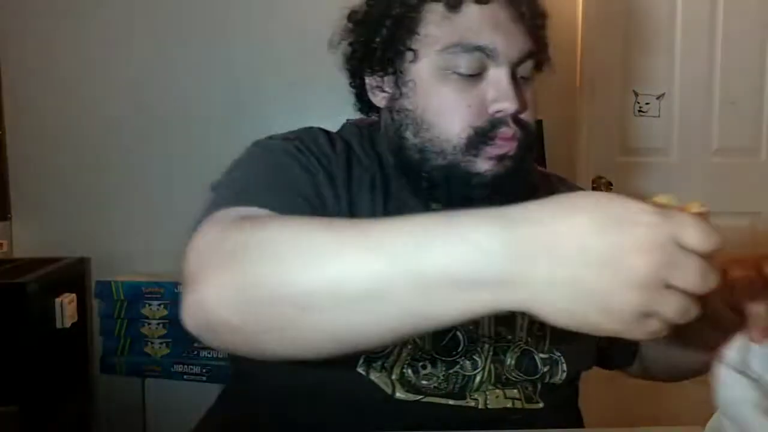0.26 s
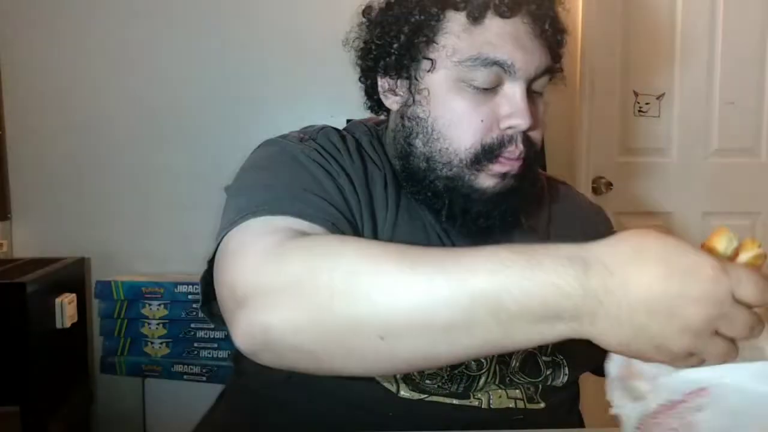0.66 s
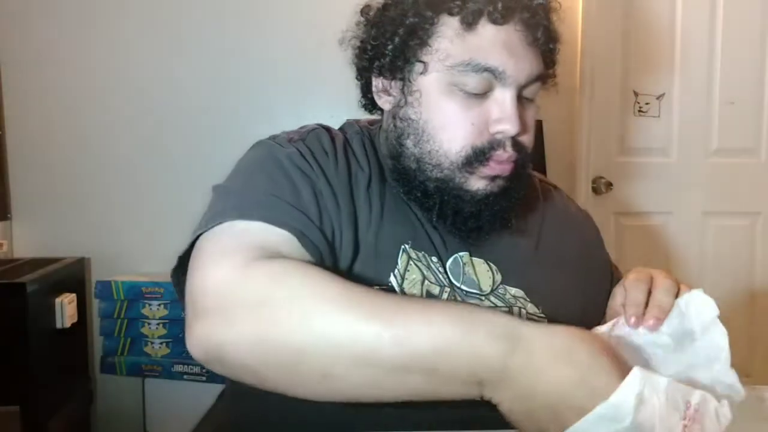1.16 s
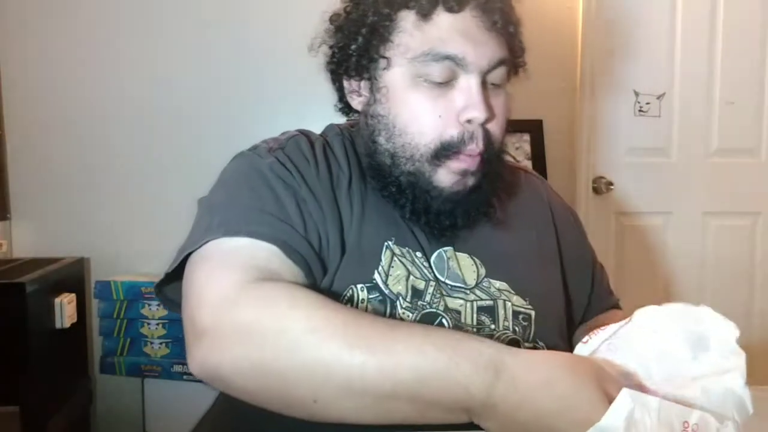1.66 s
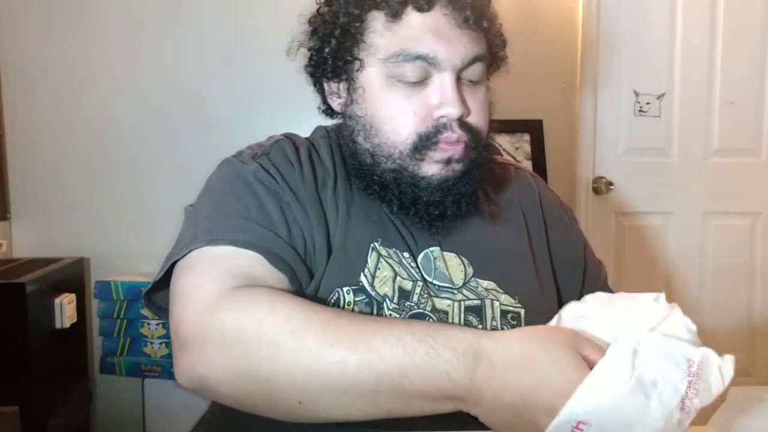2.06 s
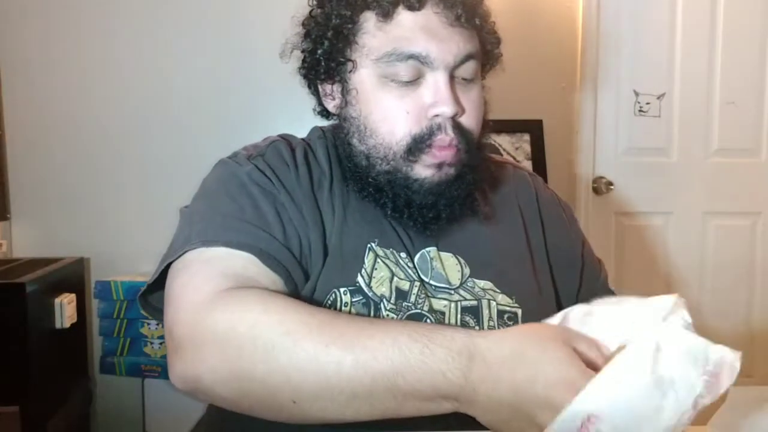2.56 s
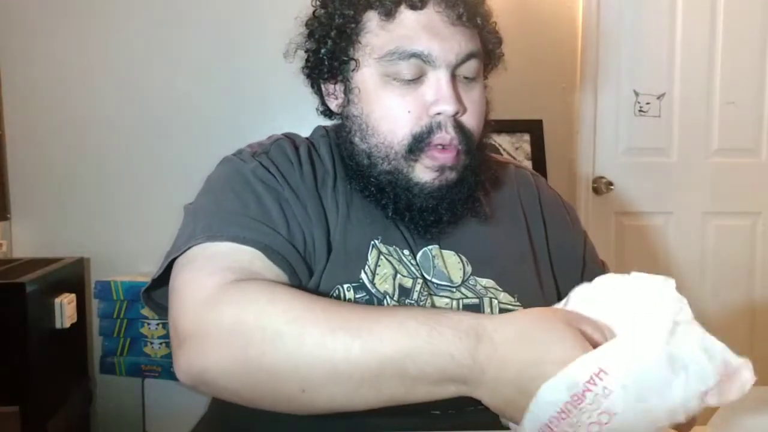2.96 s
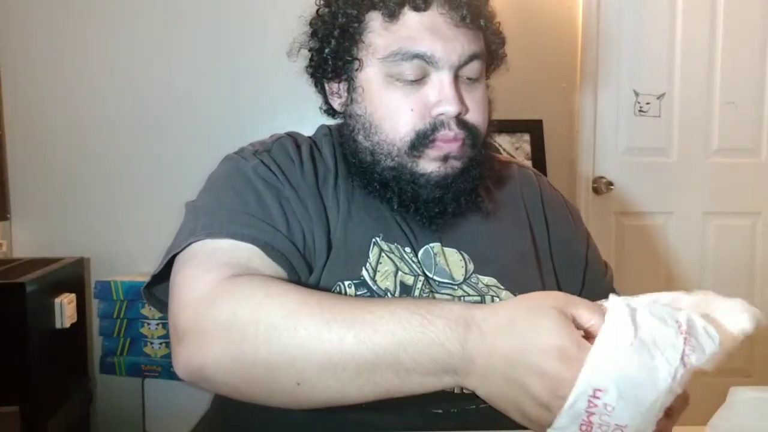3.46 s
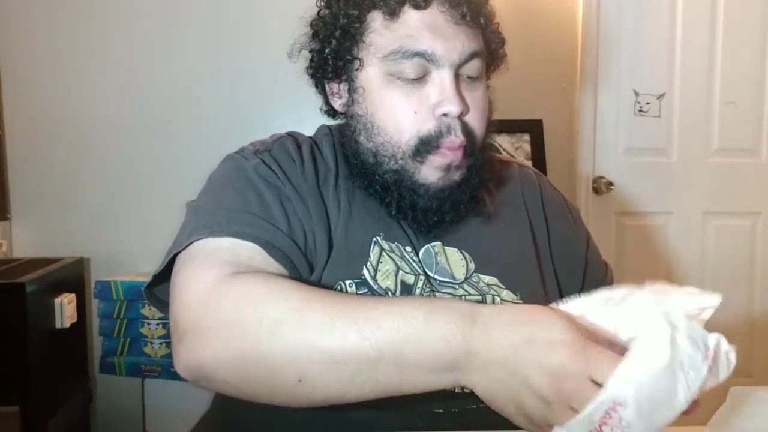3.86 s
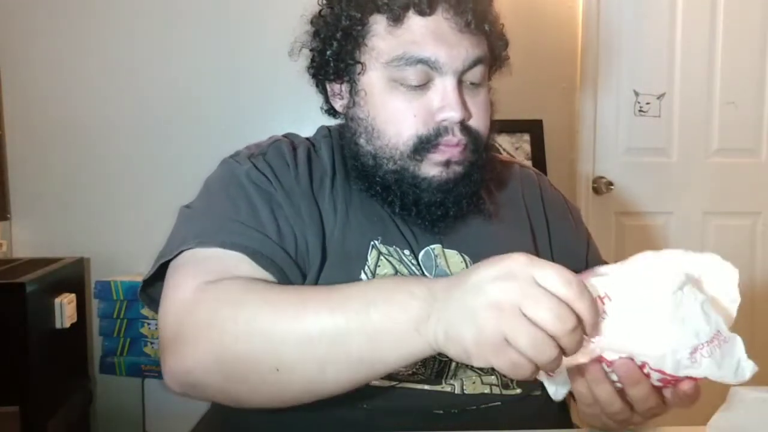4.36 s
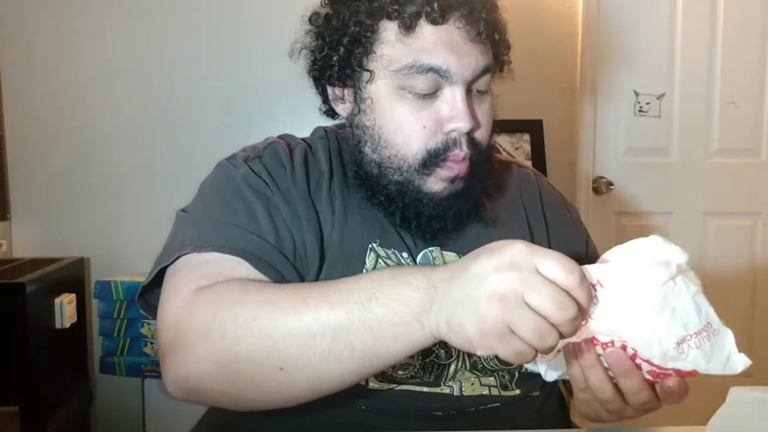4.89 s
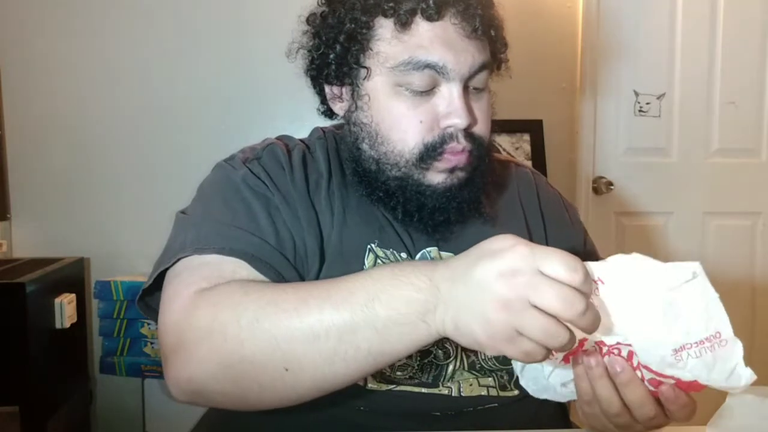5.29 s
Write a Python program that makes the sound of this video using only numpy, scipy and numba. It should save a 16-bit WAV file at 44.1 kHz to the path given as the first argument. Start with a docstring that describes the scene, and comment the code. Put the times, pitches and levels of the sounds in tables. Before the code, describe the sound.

A thin, crisp paper food wrapper is crumpled and turned in two hands at a table, heard close in stereo in a small room with short, blurred echoes. Dense fine crackling starts at once and surges at 0.3 s, with hollow panel pops and a low sleeve rumble beneath. A sharp snap comes at 0.6 s, a bright rustle around 0.75-1 s, and a tight higher pop at 1.6 s. Rustling continues in waves, with a soft forearm bump on the table at 2.1 s, a fuller squeeze near 2.5 s, a hard dry snap at 2.86 s and faint cloth drag around 3 s. Low pops cluster at 4.1-4.4 s, with snaps to 4.5 s. The crackle fades to near silence by 4.8 s, then a brief rustle at 4.95-5.3 s and a final crackle with a pop at 5.5 s. Faint air hush throughout; highest treble leans left.

```python
"""Crisp, close crinkling: a paper food wrapper is crumpled and turned in two hands at a table in a small room.
Tens of thousands of tiny creases ring as very short notes; a few big creases stand out as bursts of such notes.
Wide panels of the sheet pop low, cloth drags in short rumbles and a forearm bumps the ringing table top.
Changing echoes blur the paper, and a faint hush of shaped noise lies under it all.
The sound is stereo, with the paper's highest treble stronger on the left."""
import sys
import numpy as np
from scipy import signal
from scipy.fft import rfft, irfft, next_fast_len
from scipy.io import wavfile
from scipy.ndimage import uniform_filter1d, map_coordinates
from numba import njit

SR = 44100
rng = np.random.default_rng(int(sys.argv[2]) if len(sys.argv) > 2 else 0)


def wav_out(sig):
    """Save sig, one row per channel (or a flat mono array), as 16-bit PCM at SR to the path in sys.argv[1]."""
    wavfile.write(sys.argv[1], SR, np.round(np.clip(np.atleast_2d(sig).T, -1, 1) * 32767).astype(np.int16))


def decibels_to_gain(level_db):
    """Convert a level in decibels to a linear amplitude gain (20 dB per decade)."""
    exponent = np.asarray(level_db, float) / 20
    return 10 ** exponent


N = 243784  # length in samples

RISE_CYCLES = 0.45  # nothing starts ringing at once
LEFT_LAG_S, LAG_SPREAD_S = 0.00009, 0.00008  # how much later the left port hears the sheet
TOP_HZ = 15390  # upper edge of the treble


def read(table, hz):
    """Look up a (f/Hz, value) table along a log-frequency axis."""
    f, value = np.transpose(table)
    return np.interp(np.log(np.maximum(hz, 1)), np.log(f), value)


def colour(x, db):
    """Filter by a gain in dB that depends on frequency."""
    size = next_fast_len(N)
    gain = decibels_to_gain(db(np.arange(size // 2 + 1) * SR / size))
    return irfft(rfft(x, size) * gain, size)[..., :N]


def walk(rate):
    """Random level that glides to a new value every 1 / rate seconds; its spread is about 0.6."""
    hold = int(SR / rate)
    steps = np.repeat(rng.standard_normal(N // hold + 1), hold)
    return 0.78 * uniform_filter1d(steps, hold)[:N]


def alike_in_bass(split_hz):
    """Two noises that share the bass and differ in the treble."""
    mid, side = rng.standard_normal((2, N))
    side = colour(side, lambda hz: -10 * np.log10(1 + (split_hz / (hz + 1)) ** 4))
    return mid + side * np.array([[1], [-1]])


@njit
def rings(start, hz, t60, size):
    """Damped sines that start between samples and swell over about RISE_CYCLES of their own cycles."""
    out = np.zeros(N)
    for k in range(len(start)):
        first = int(start[k]) + 1
        rate = 2j * np.pi * hz[k] / SR - np.log(1000) / (t60[k] * SR)
        wave = size[k] * np.exp(rate * (first - start[k]))
        turn = np.exp(rate)
        shrink = np.exp(-hz[k] / SR / RISE_CYCLES)
        missing = shrink ** (first - start[k])  # the part that has not swelled up yet
        for i in range(max(first, 0), min(first + int(t60[k] * SR) + 2, N)):
            out[i] += wave.imag * (1 - missing)
            missing *= shrink
            wave *= turn
    return out


def heard(s, hz, t60, size, place):
    """Each spot on the sheet reaches the two microphone ports with its own lag, pitch shade and balance."""
    half_lag = (LEFT_LAG_S + LAG_SPREAD_S * place[0]) * SR / 2
    shade = 1 + np.clip(hz / 60000, 0, 0.2) * place[1]
    balance = decibels_to_gain(2.31 * place[2] * np.clip(hz / 800 - 0.3, 0, 1))
    top = 0.45 * SR
    left = rings(s * SR + half_lag, np.minimum(hz * shade, top), t60, size * balance)
    right = rings(s * SR - half_lag, np.minimum(hz / shade, top), t60, size / balance)
    return np.array([left, right])


# Squeezes of the sheet. Columns: t/s at full strength, effort level/dB,
# time/s to swell by STEP_DB, time/s to fade by STEP_DB
SQUEEZES = [(0.063, -52.0, 0.016, 0.041), (0.148, -50.0, 0.015, 0.061), (0.231, -46.5, 0.035, 0.085),
            (0.314, -40.0, 0.014, 0.1), (0.486, -49.0, 0.02, 0.16), (0.6, -46.5, 0.021, 0.15),
            (0.75, -44.0, 0.0039, 0.065), (0.914, -51.5, 0.023, 0.18), (1.08, -51.5, 0.0038, 0.35),
            (1.177, -46.5, 0.049, 0.057), (1.349, -47, 0.14, 0.087), (1.526, -51.5, 0.18, 0.16),
            (1.61, -48.0, 0.02, 0.039), (1.701, -58.0, 0.012, 0.097), (1.893, -51.0, 0.14, 0.19),
            (1.967, -45.5, 0.023, 0.12), (2.118, -51.0, 0.1, 0.17), (2.313, -49.5, 0.05, 0.07),
            (2.462, -44.5, 0.054, 0.084), (2.582, -42.0, 0.13, 0.15), (2.765, -53.0, 0.5, 0.031),
            (2.836, -50.0, 0.037, 0.38), (3.08, -47.0, 0.5, 0.095), (3.23, -53.0, 0.19, 0.062),
            (3.343, -51.0, 0.013, 0.38), (3.418, -49.0, 0.086, 0.2), (3.614, -44.5, 0.062, 0.11),
            (3.76, -47.0, 0.023, 0.14), (3.928, -48.5, 0.069, 0.28), (4.111, -43.5, 0.041, 0.083),
            (4.198, -50.0, 0.5, 0.055), (4.36, -51.5, 0.081, 0.2), (4.491, -46.5, 0.23, 0.15),
            (5.03, -60, 0.07, 0.05), (5.05, -50.5, 0.01, 0.21), (5.159, -50.0, 0.096, 0.125),
            (5.45, -66, 0.08, 0.07), (5.523, -53.5, 0.0037, 0.13)]
# Light rubbing of fingers on paper, heard between the squeezes. Columns: t/s, effort level/dB
RUBBING = [(0.0, -59), (2.5, -72), (4.4, -72), (4.82, -82), (4.95, -70), (5.4, -77), (5.53, -68)]
# Treble of the crackle at middling effort. Columns: t/s, relative level/dB
TREBLE = [(0.0, 2.0), (0.55, -2.5), (0.8, 2.5), (0.97, 8.5), (1.1, -0.5), (1.97, -1.5), (2.35, 3.0),
          (2.5, -4.5), (2.62, -2.0), (3.3, 0.5), (3.45, 2.5), (3.65, -2.0), (4.15, 1.5), (4.5, -2.0),
          (4.78, -5.0), (4.9, -12.5), (4.96, 1.0), (5.25, -0.5), (5.42, -6.5), (5.53, -2.5)]
STEP_DB, FADE_POWER = 12, 1.4  # a fade starts gently and steepens
CRISP_DB_PER_DB, MIDDLING_DB = 0.35, -50  # harder squeezes crackle brighter


def hands():
    """Effort and crispness (dB) over time: squeezes swell and fade, and their powers add to the rubbing."""
    t = np.arange(N // 32 + 2) * 32 / SR
    full, db, swell, fade = np.transpose(SQUEEZES)[:, :, None]
    before = np.maximum(full - t, 0) / swell
    after = np.maximum(t - full, 0) / fade
    db = db - STEP_DB * (before + after ** FADE_POWER)
    power = decibels_to_gain(2 * np.maximum(db, -200)).sum(axis=0)
    power = power + decibels_to_gain(2 * np.interp(t, *np.transpose(RUBBING)))
    effort = 10 * np.log10(power)
    crisp = np.interp(t, *np.transpose(TREBLE)) + CRISP_DB_PER_DB * (effort - MIDDLING_DB)
    return t, effort, crisp


# Tone of the paper's small creases. Columns: f/Hz, relative level/dB
PAPER = [(180, -26), (290, 0), (400, -2), (520, -1), (750, -5), (2040, .5), (3610, 1), (5010, 2.2),
         (8880, 0.5), (11200, 5), (15000, -5)]
# Low crackle of the wide folds, over the rest. Columns: t/s, relative level/dB
LOWS = [(0, 4.5), (.4, 2), (.85, -1.5), (1.15, 2.5), (2.3, 1), (2.6, -2.5), (2.95, 2.5), (3.3, -2.5),
        (4.3, 3), (4.93, -10), (5.2, 2.5), (5.32, 6), (5.45, -2)]
CREASES_PER_S = 12000


def crackle(zones=12):
    """Dense small creases of every pitch; effort sets their size, and they come in quick flurries."""
    count = int(CREASES_PER_S * N / SR)
    when, pitch, big, sign = rng.random((count, 4)).T
    s = when * N / SR
    hz = 220 * 75 ** pitch ** 0.5
    t, effort, crisp = hands()
    treble = np.clip(np.log2(hz / 5000) / 1.15, 0, 1)
    db = np.interp(s, t, effort) + treble * (np.interp(s, t, crisp) + 1.0)
    # a light touch moves the wide, low-sounding folds less
    db = db + 0.33 * np.clip(np.log2(1300 / hz), 0, 0.5) * 2 * np.minimum(db + 65.0, 0)
    db = db + np.clip(np.log2(1200 / hz), 0, 0.5) * 2 * np.interp(s, *np.transpose(LOWS))
    # one flurry shakes the whole sheet, others favour creases of one size
    sheet_db = 0.9 * walk(50) + 0.4 * walk(180)
    zone_db = np.array([4.0 * walk(9) + 2.7 * walk(60) for _ in range(zones)])
    at = when * (N - 1)
    zone = np.log2(hz / 220) / 6.3 * (zones - 1)
    db = db + sheet_db[at.astype(int)] + map_coordinates(zone_db, [zone, at], order=1)
    # a few creases are much bigger than most, above all the low ones
    db = db - 2.5 * np.clip(4500 / hz, 0, 1) * np.log(1.002 - big) + read(PAPER, hz)
    size = np.sign(sign - 0.5) * decibels_to_gain(db - 0.4) * (hz / 3000) ** 0.56
    return heard(s, hz, 9.18 / hz, size, rng.standard_normal((count, 3)).T)


# Tone of the room hush. Columns: f/Hz, relative level/dB
HUSH = [(24, -12), (85, -3), (166, 2), (301, -15), (505, -6), (802, -27), (1170, 0), (1460, -13), (2600, 1),
        (3500, -14), (6000, -9), (8100, -24), (16000, -32)]
HUSH_DB = -73  # middle level


def hush():
    """The faint steady air of the room: shaped noise, wavering a little."""
    air = colour(alike_in_bass(40), lambda hz: read(HUSH, hz))
    return air / air.std() * decibels_to_gain(HUSH_DB + 1.5 * walk(16))


# Ringing modes of the table top. Columns: f/Hz, relative level/dB, time/s to die away by 60 dB
TABLE = [(83.8, -11.5, 0.66), (120.6, 2, 0.14), (154.7, 5, 0.23), (187, -6, 0.2)]
# Forearm on the table. Columns: t/s, relative level/dB, f/Hz of the modes nearest the spot that is pushed
BUMPS = [(2.138, -48, 163), (4.874, -61, 155)]


def table_top():
    """Soft pushes ring the low modes of the table top; the hands' work keeps it humming faintly."""
    hz, mode_db, t60 = np.transpose(np.array(TABLE)).copy()
    out = 0
    for s, db, spot_hz in BUMPS:
        size = decibels_to_gain(db + mode_db - 12.3 * np.abs(np.log2(hz / spot_hz)))
        start = np.full(len(hz), s * SR)
        # flesh presses gradually: taking away a short ring makes the long one swell before it fades
        out = out + rings(start, hz, t60, size) - rings(start, hz, np.full(len(hz), 0.05), size)
    t, effort, _ = hands()
    shake_db = 0.5 * np.interp(np.arange(N) / SR, t, effort) + 2.1 * walk(15) - 97.0
    shake = rng.standard_normal(N) * decibels_to_gain(shake_db)
    ring = rings(0 * hz, hz, t60, decibels_to_gain(mode_db))[:SR // 2]
    out = out + signal.fftconvolve(shake, ring)[:N]
    dull = colour(out, lambda f: -10 * np.log10(1 + (f / 220) ** 4))
    return dull * decibels_to_gain(np.array([[-0.8], [0.8]]))  # a little louder on the right


ROOM_T60_S, ROOM_TREBLE_T60_S, ROOM_DB = 0.24, 0.12, -6.5
ROOM_ALIKE_HZ = 520  # echoes are alike at both ports below this


def room(x, hop=1024):
    """A decaying cloud of echoes, the treble dying sooner; as the hands move, each moment finds other paths."""
    t = np.arange(SR // 4) / SR
    size, count = next_fast_len(len(t) + 2 * hop), N // hop + 2
    echoes = rng.standard_normal((count, 2, len(t)))
    bass = signal.lfilter([0.3], [1, -0.7], echoes)
    treble = echoes - bass
    tail = bass * decibels_to_gain(-60 * t / ROOM_T60_S) + treble * decibels_to_gain(-60 * t / ROOM_TREBLE_T60_S)
    tail = tail * np.clip(t / 0.0018 - 0.5, 0, 1)  # the first echoes take about a millisecond
    tail = rfft(tail / np.sqrt(2 * np.mean(np.sum(tail ** 2, axis=2))), size)
    hz = np.arange(size // 2 + 1) * SR / size
    side = tail[:, 1:] / np.sqrt(1 + (ROOM_ALIKE_HZ / (hz + 1)) ** 8)
    tail = tail[:, :1] + side * np.array([[1], [-1]])
    x = np.pad(x, ((0, 0), (hop, 3 * hop)))
    out = np.zeros((2, (count + 1) * hop + size))
    fade = np.sin(np.pi * np.arange(2 * hop) / (2 * hop))
    for k in range(count):
        part = x[:, k * hop:(k + 2) * hop]
        faded = part * fade[:part.shape[1]]
        out[:, k * hop:k * hop + size] += irfft(rfft(faded, size) * tail[k], size)
    return decibels_to_gain(ROOM_DB) * out[:, hop:hop + N]


# Panels of the sheet flipping over. Columns: t/s, relative level/dB, pitch f/Hz
POPS = [(.093, -47, 431), (.161, -41, 463), (.243, -46, 386), (.276, -44, 310), (.314, -33, 514),
        (0.479, -35, 348), (.752, -44, 373), (1.161, -41, 520), (1.212, -42.5, 580), (1.611, -33, 1790),
        (1.615, -36, 1640), (2.444, -39, 425), (3.604, -44.5, 510), (4.099, -35.5, 460), (4.134, -43, 380),
        (4.179, -44, 420), (4.215, -34.5, 350), (4.289, -39, 400), (4.345, -45, 310), (4.409, -41, 396),
        (4.837, -55, 380), (4.846, -54, 480), (5.106, -45.5, 567), (5.153, -35.5, 522), (5.523, -30.5, 380)]


def pops():
    """A panel flips with a short hollow note, alike at both ports but for the lag; small tight panels ring longest."""
    s, db, hz = np.transpose(POPS)
    t60 = 0.026 * (hz / 450) ** 0.3
    return heard(s, hz, t60, decibels_to_gain(db), np.zeros((3, len(s))))


# Big creases. Columns: t/s near the middle, strength level/dB, note f/Hz,
# treble hiss level/dB relative to the strength, length/ms
SNAPS = [(0.1481, -43, 5950, 5, 4.2), (0.339, -42, 4340, 8, 5.4), (0.4787, -50, 2300, 11, 6),
         (0.599, -31, 4600, -4, 1.4), (0.6595, -41, 6000, 6, 1.4), (0.7555, -46, 4700, 18, 7.66),
         (0.9115, -44, 2380, 13, 3.07), (1.082, -39, 4860, 6.5, 3.65), (1.5033, -47, 1700, 8.5, 8),
         (1.5301, -44, 2520, 4.5, 7.1), (1.6117, -43.5, 1770, 12.5, 4.3), (1.7033, -38, 1630, 0, 1.8),
         (1.7755, -50, 2500, 3, 3), (1.9734, -40, 5530.0, 7.5, 4.1), (2.456, -42, 6100, 12, 2.4),
         (2.8621, -26.5, 3300, -16, 1.4), (3.3448, -52, 3130.0, 21.5, 2.3), (3.8576, -47, 3370, 9, 4.9),
         (4.112, -37.5, 4910.0, 2, 3.9), (4.3015, -44, 4500, 11, 5), (4.4204, -44, 2100, 14, 2.6),
         (4.445, -38, 2000, -8, 2.5), (4.459, -35, 5000, 6, 1.85), (4.6679, -57, 1290, -4, 4.9),
         (4.8196, -56, 3400, -8, 2.5), (4.9236, -57, 4910.0, 0, 3.2), (4.945, -54, 4460, 15.5, 2.9),
         (5.0493, -49, 2100, 16, 4.04), (5.13, -44, 4450.0, 7.5, 2.8), (5.1731, -41, 2700, 1.0, 2.5),
         (5.2355, -48, 5300, 12.5, 3.8), (5.3333, -53, 2900.0, -15, 2.8)]


def snaps(count=48):
    """A big crease runs along the sheet: a burst of fine cracks and a short note from the fold it opens."""
    s, db, hz, hiss_db, ms = (np.repeat(c, count) for c in np.transpose(SNAPS))
    sign, spread = rng.random((len(s), 2)).T
    chance = rng.standard_normal((len(s), 5)).T
    # it starts sharply and trails off
    s = s + 0.3 * ms / 1000 * chance[4] * np.where(chance[4] < 0, 0.6, 1)
    size = np.sign(sign - 0.5) * decibels_to_gain(db) * np.sqrt(ms)  # a longer run breaks more fibres
    note_hz = hz * 2 ** (0.06 * chance[0])
    note = heard(s, note_hz, 14.0 / note_hz, size * decibels_to_gain(-12.0), chance[1:])
    hiss_hz = 0.7 * hz + (TOP_HZ - 0.7 * hz) * spread
    hiss_size = size * decibels_to_gain(hiss_db * np.clip(hiss_hz / 8500, 0, 1) - 6.0)
    hiss = heard(s, hiss_hz, 10.6 / hiss_hz, hiss_size, chance[1:])
    return note + hiss


# Sleeve dragged over the table top. Columns: t/s at the middle, length/s, level/dB,
# f/Hz where the rumble is strongest
DRAGS = [(.27, .12, -61, 200), (.37, .14, -62, 140), (2.99, .28, -65, 125), (3.85, .14, -69, 125)]


def drags():
    """Cloth sticks and slips on the wood: a broad, lumpy rumble that swells and fades."""
    t, out = np.arange(N) / SR, 0
    for s, length, db, hz in DRAGS:
        rumble = colour(alike_in_bass(250), lambda f: -12.0 * np.abs(np.log2((f + 1) / hz)) ** 1.4)
        level = db + 3.0 * walk(40) - 12 * (2 * (t - s) / length) ** 2
        out = out + rumble / rumble.std() * decibels_to_gain(level)
    return out


SHEET_HZ = 255
POP_ECHO_DB = -6  # pops sound inside the cupped hands and echo less


def scene():
    """Paper and its echoes, the table and the hush."""
    # a small sheet moves too little air to sound any bass
    sheet = signal.butter(5, SHEET_HZ, "high", fs=SR, output="sos")
    creases = signal.sosfilt(sheet, crackle() + snaps())
    panels = signal.sosfilt(sheet, pops())
    echoes = room(creases + decibels_to_gain(POP_ECHO_DB) * panels)
    return creases + panels + echoes + table_top() + drags() + hush()


def roll_off(x):
    """The treble ends steeply here."""
    return signal.sosfilt(signal.butter(12, 17000, fs=SR, output="sos"), x)


# Balance of the two ports. Columns: f/Hz, left minus right level/dB
LEAN = [(200, -0.5), (700, 0), (2400, -0.5), (5500, -2.5), (8100, 3), (11000, 14.5), (15000, 12)]


def record(dry):
    """The housing shades the right port's treble, and a steep filter cuts the top."""
    half = np.array([[0.5], [-0.5]])  # each port takes half of the balance
    ports = colour(dry, lambda hz: half * read(LEAN, hz) - 10 * np.log10(1 + (hz / TOP_HZ) ** 160))
    return roll_off(ports)


dry = scene()
out = record(dry)
wav_out(out)
```